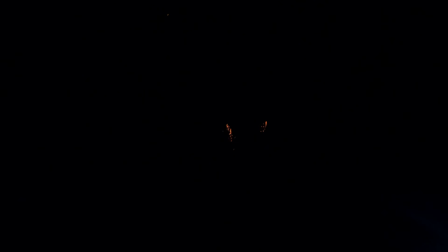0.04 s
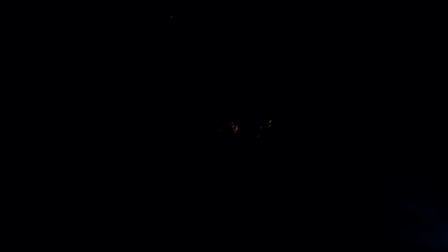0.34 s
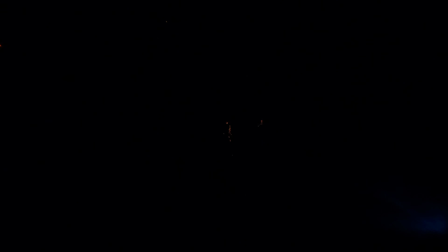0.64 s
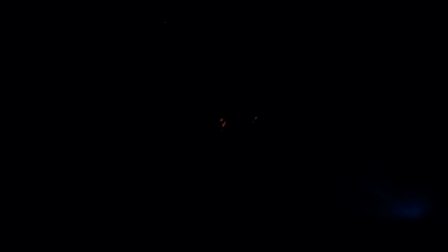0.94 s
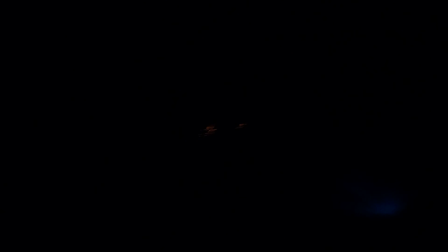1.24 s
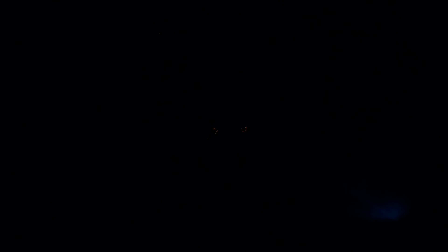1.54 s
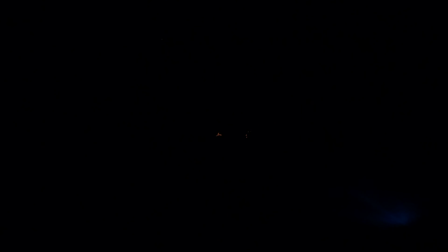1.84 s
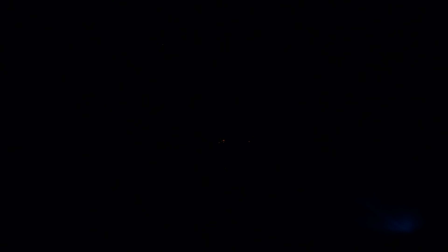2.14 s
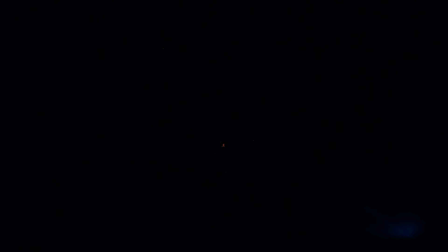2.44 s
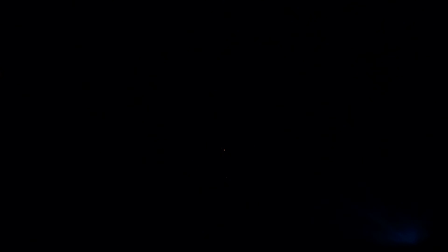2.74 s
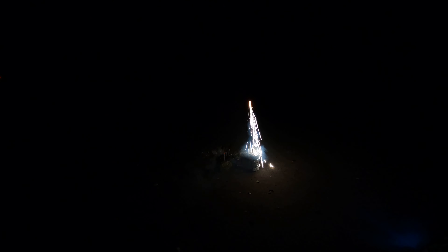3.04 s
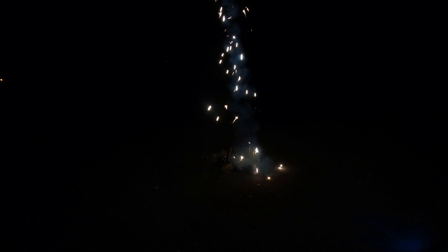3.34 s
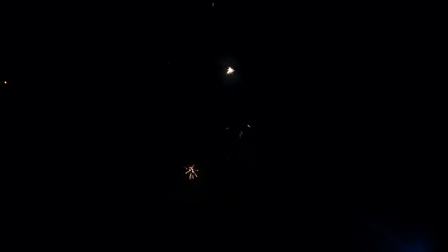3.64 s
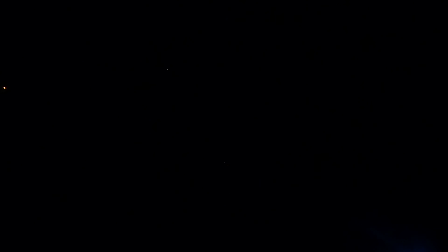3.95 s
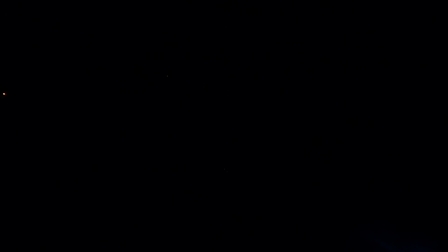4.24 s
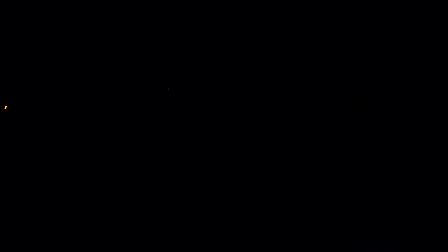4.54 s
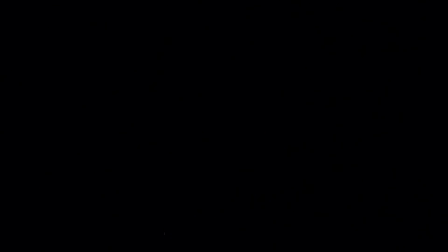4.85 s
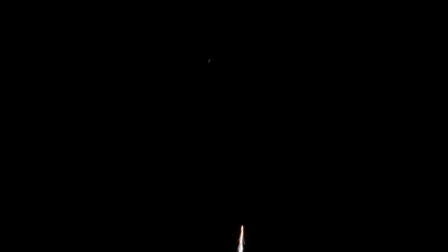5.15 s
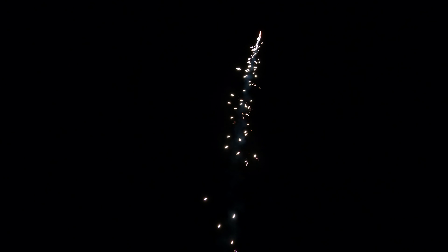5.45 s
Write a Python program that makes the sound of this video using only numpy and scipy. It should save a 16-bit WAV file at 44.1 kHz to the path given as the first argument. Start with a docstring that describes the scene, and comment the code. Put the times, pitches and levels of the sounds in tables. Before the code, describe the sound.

A firework fuse fizzes faintly outdoors, with small spits and sharp little pops at the very start, around 0.7 seconds and again at 1.5 seconds. A soft gust rumbles on the microphone near 1.2 seconds. After a short spit, the first rocket catches at 3 seconds with a very loud, sharp chirp and a low buffet of wind. A loud, shrill, raspy whistle follows at once over a rushing jet hiss, sliding steadily down in pitch. From about 4 seconds it grows thinner, fainter and wavering as the rocket climbs, warbling briefly around 4.6 seconds. At 4.9 seconds, with another light gust, a second sharp chirp starts the next rocket. Its whistle begins high again, wobbles, then falls, staying loud until the end at about 5.6 seconds. Dull echoes from the surroundings trail both whistles.

```python
"""Two whistling rockets at night

A fuse hisses, spits and pops on open ground. Each motor catches with a sharp chirp, then its burn
pulsates in the tube and screams downward in pitch as the rocket climbs on a rushing jet.
The ray reflected by the ground interferes with the direct one, the surroundings scatter echoes,
and gusts rumble on the microphone."""
import sys
import numpy as np
from scipy import signal
from scipy.fft import rfft, irfft, next_fast_len
from scipy.io import wavfile
from scipy.ndimage import map_coordinates

SR = 44100
rng = np.random.default_rng(int(sys.argv[2]) if len(sys.argv) > 2 else 0)


def bounce(signal):
    """Save signal as a 16-bit WAV file at the path given by the first command-line argument."""
    frames = np.transpose(np.atleast_2d(signal))
    limited = np.clip(frames, -1, 1)
    pcm = np.round(limited * 32767).astype(np.int16)
    wavfile.write(sys.argv[1], SR, pcm)


N = 246959
TIME = np.arange(N) / SR

# Background level, which sinks once the whistle starts: t/s, level/dB
HUSH_LEVEL = [(0,-48.5),(.4,-53),(1.3,-53.5),(2.2,-56.5),(3.0,-54),(3.3,-82.5),(4.7,-71),(5.6,-68)]


def from_db(db):
    """Amplitude ratio of a level in decibels."""
    return 10 ** (np.asarray(db) / 20)


def rms_one(x):
    """Normalisation to unit mean power."""
    return x / np.sqrt(np.mean(x ** 2) + 1e-20)


def in_time(rows):
    """Linear interpolation of each column at every sample."""
    s, *columns = np.transpose(rows)
    return [np.interp(TIME, s, c) for c in columns]


def at_hz(points, hz):
    """Interpolation of a spectrum on a logarithmic frequency axis."""
    f, value = np.transpose(points)
    return np.interp(np.log(np.maximum(hz, 1)), np.log(f), value)


def panned(pan_db):
    """A level difference as left and right gains whose mean is one."""
    gains = from_db(np.array([[.5], [-.5]]) * pan_db)
    return gains / gains.mean(axis=0)


def drift(rate_hz, step=16):
    """Slow random fluctuation: low-pass noise of unit power."""
    count = next_fast_len(N // step + 2)
    hz = np.fft.rfftfreq(count, step / SR)
    slow = irfft(rfft(rng.standard_normal(count)) / (1 + (hz / rate_hz) ** 2), count)
    return np.interp(np.arange(N) / step, np.arange(count), rms_one(slow))


def coloured_noise(colour, correlation):
    """Partly coherent stereo noise of a given spectral shape and unit power."""
    hz = np.fft.rfftfreq(N, 1 / SR)
    mid, side = rfft(rng.standard_normal((2, N))) * from_db(at_hz(colour, hz))
    alike = np.clip(at_hz(correlation, hz), -1, 1)
    return rms_one(irfft(np.sqrt(1 + alike) * mid + np.sqrt(1 - alike) * side * [[1], [-1]], N))


def filtered(x, edges_hz, kind, order=2):
    """Causal Butterworth filter."""
    sections = signal.butter(order, np.clip(edges_hz, 10, .45 * SR), kind, fs=SR, output="sos")
    return signal.sosfilt(sections, x)


def delayed(x, late_s):
    """Time-varying propagation delay."""
    return map_coordinates(x, [np.arange(N) - late_s * SR], order=3)


def air(flicker_db=1.18):
    """Broadband noise of the night air, with narrow resonances for the hollow fizz of the fuse."""
    # Spectrum of the hush: f/Hz, relative density/dB
    colour = [(60,-3.5),(160,0),(350,-10.5),(600,-8.5),(850,-15),(1400,-7.5),(2000,-13.5),(2700,-10),(3600,-17.5),(4400,-15),(5700,-17),(7200,-21),(10500,-26),(15500,-39.5)]
    # Stereo coherence: f/Hz, left-right correlation
    correlation = [(60,0.41),(300,0.75),(1400,0.76),(3100,0.51),(6800,0.1),(15000,.1)]
    # Resonances of the fuse: f/Hz, bandwidth/Hz, level/dB re the hush
    fuse_rings = [(2700,210,-18.5),(4200,410,-18),(5750,380,-17.5),(8760,430,-22)]
    level_db, = in_time(HUSH_LEVEL)
    hush = coloured_noise(colour, correlation)
    for hz, width, db in fuse_rings:
        ring = filtered(rng.standard_normal(N), [hz - width / 2, hz + width / 2], "band")
        hush = hush + from_db(db) * rms_one(ring)
    return from_db(level_db + flicker_db * drift(30)) * hush


def wind(breeze_db=-3.5, lump_db=4.0, attack_s=0.026, release_db_per_s=106):
    """Turbulent pressure buffets the microphone; a light breeze and the gusts add in power."""
    # Gusts: t/s, time until release/s, level/dB, left-right/dB
    gusts = [(0.072,0.034,-51,-1),(0.446,0.046,-57,-12),(0.746,0.036,-49.5,-3),(0.942,0.026,-55,-12),(1.166,0.026,-33,-16),(1.267,0.079,-36,-6.5),(2.987,0.08,-25.5,-11.5),(3.087,0.087,-25,-24.5),(3.294,0.062,-51,9),(4.763,0.096,-40.5,-1),(4.874,0.15,-36,-1.5),(5.166,0.092,-49,-2),(5.366,0.11,-51.5,-1.5)]
    # Spectrum of the buffeting: f/Hz, relative density/dB
    colour = [(12, -16), (20, 1.5), (43, 4), (69, 0), (232, -22), (276, -31.5), (409, -37.5), (500, -39),
              (650, -62.5), (1100, -120)]
    # Stereo coherence: f/Hz, left-right correlation
    correlation = [(20,0.18),(500,1)]
    hush_db, = in_time(HUSH_LEVEL)
    power = from_db(hush_db + breeze_db) ** 2
    for s, hold_s, db, pan_db in gusts:
        swell = np.clip((TIME - s) / attack_s, 0, 1)
        release_db = release_db_per_s * np.maximum(TIME - s - hold_s, 0)
        power = power + (swell * from_db(db - release_db) * panned(pan_db)) ** 2
    return np.sqrt(power) * from_db(lump_db * drift(25)) * coloured_noise(colour, correlation)


def surroundings(x, t60_s=1.74, first_s=0.032, echoes_per_s=900, damp_hz=3500, spread=.15):
    """Scattering by trees and buildings returns late, dull echoes that decay exponentially."""
    age = np.arange(2 * SR) / SR
    scatter = rng.standard_normal((2, len(age))) * (rng.random(len(age)) < echoes_per_s / SR)
    mid, side = scatter * from_db(-60 * age / t60_s) * np.clip(age / first_s - 1, 0, 1)
    echoes = mid + spread * side * [[1], [-1]]
    echoes /= np.sqrt(np.sum(echoes ** 2) / 2)
    return signal.fftconvolve(np.atleast_2d(x), filtered(echoes, damp_hz, "low"), axes=1)[:, :N]


def spits(grain_db=5.5, spread=0.28):
    """Superposition of tiny powder cracks makes each spit a short swell of band-limited noise."""
    # Spits of fuse and launch: t/s, duration/s, level/dB, centre f/Hz, width/octaves, left-right/dB
    bursts = [(0.0,.056,-44,246,0.46,-4),(0.056,0.052,-40.5,1150,1.5,1),(0.087,0.028,-41.5,330,3,0),(0.113,.025,-53,8550,0.5,3),(0.149,0.058,-49,1650,0.74,0),
              (.467,0.13,-57,5300,0.46,0),(.514,0.0039,-40.5,930,0.41,5),(0.56,0.064,-50,2080,1.4,3),
              (0.675,0.073,-37.5,5700,0.54,0.5),(.681,0.078,-38,2260,1.2,1),(.719,0.028,-34.5,2460,0.21,4),(0.783,0.027,-49,276,1.5,2),(0.863,0.028,-48.5,7560,0.28,4),(0.869,0.0075,-51,2450,0.15,7),(.986,0.049,-58.5,5450,0.16,-7),
              (1.311,0.03,-48,460,1.6,-15),(1.307,0.088,-54.5,3740,1.1,5),(1.504,0.049,-49,1800,2.3,5),(1.525,0.031,-47,4070,.57,-3),
              (1.873,0.017,-50,860,1.4,5),(2.071,0.04,-60.5,8100,0.29,7),(2.076,.03,-55.5,2750,.35,7),(2.283,0.015,-51.5,250,1.4,5),(2.315,0.069,-59.5,1970,2.2,2.5),
              (2.829,0.095,-54,1730,1.2,5.5),(2.916,0.13,-39,2690,0.18,-0.5),(2.984,0.022,-40.5,3830,1.0,-1.5),(2.992,0.028,-25,3330,0.054,-8.5),(2.993,0.034,-34,154,0.73,0),
              (5.048,0.052,-44,228,0.7,0)]
    out = np.zeros((2, N + SR))
    age = np.arange(SR // 4) / SR
    for s, length, db, hz, octaves, pan_db in bursts:
        swell = np.sin(np.pi * np.clip(age / length, 0, 1) ** 0.74).clip(0) ** 0.77
        cracks = from_db(grain_db * np.minimum(rng.exponential(1, len(age)), 5))
        mid, side = rng.standard_normal((2, len(age))) * cracks * swell
        band_hz = hz * 2 ** (np.array([-.5, .5]) * octaves)
        puff = filtered(mid + spread * side * [[1], [-1]], band_hz, "band", order=1)
        puff = filtered(puff, hz * 2 ** (.5 + octaves / 2), "low")
        puff *= from_db(db) / np.sqrt(np.sum(puff ** 2) / (2 * length * SR))
        start = round(s * SR)
        out[:, start:start + len(age)] += puff * panned(pan_db)
    return out[:, :N]


def snaps(decay_s=0.0012):
    """An impulsive source: a single powder grain bursts and dies away within milliseconds."""
    # Bursting grains: t/s, peak level/dB, centre f/Hz, left-right/dB
    grains = [(0.068,-24,1810,4),(.081,-26.5,1510,3),(0.175,-42,2600,0),(.515,-51,1200,3),(.686,-29,4000,5),(.699,-22.5,4500,2.5),(0.713,-16,4040,4),(.724,-23,2340,-2),(.737,-29,2200,1),(.87,-37,7300,2),(1.507,-30,2030,-2),(1.52,-26,2260,0),(1.537,-31,3380,-3),(1.877,-38.5,4000,8),(2.092,-39.5,2500,9)]
    out = np.zeros((2, N))
    age = np.arange(SR // 20) / SR
    for s, db, hz, pan_db in grains:
        burst = rng.standard_normal(len(age)) * np.exp(-age / decay_s)
        crack = filtered(burst, [hz / 2, hz * 1.84], "band")
        start = round(s * SR)
        out[:, start:start + len(age)] += from_db(db) * crack / np.abs(crack).max() * panned(pan_db)
    return out


def chirps():
    """Damped resonance: a motor's first pressure surge rings its tube for a few cycles."""
    # Motors catching: t/s, peak level/dB, f/Hz, rise time/s
    ignitions = [(2.9993,-2.5,3860,.0008),(4.9112,-5.5,3700,.0008)]
    out = np.zeros(N)
    for s, db, hz, rise_s in ignitions:
        age = np.maximum(TIME - s, 0)
        envelope = (age / rise_s) ** 2 * np.exp(2 - 2 * age / rise_s)
        out += from_db(db) * envelope * np.sin(2 * np.pi * hz * age)
    return out


def climb(age, start_m, top_m_per_s, run_up_s, mic_m=1.192, distance_m=3.0, sound_m_per_s=343):
    """Image-source geometry of a rising rocket: the ground ray's delay and the elevation's cosine."""
    height = start_m + top_m_per_s * (age - run_up_s * (1 - np.exp(-age / run_up_s)))
    direct = np.hypot(distance_m, height - mic_m)
    bounced = np.hypot(distance_m, height + mic_m)
    return (bounced - direct) / sound_m_per_s, distance_m / direct


def exhaust(age, ground_s, bright_db, dulling_db_per_s, roar_db=-37.5, split_hz=2800, reflection=0.61):
    """Jet noise recedes, treble first; interference with the ground ray sweeps a comb through the rest."""
    # Spectrum of the jet: f/Hz, relative density/dB
    colour = [(200,-21),(500,-16),(900,-10),(1300,-3.5),(1900,-2.5),(2400,2),(3200,2.5),(4200,-2.5),(6000,-9.5),(9000,-10.5),(12000,-22.5),(15500,-35)]
    # Stereo coherence: f/Hz, left-right correlation
    correlation = [(200,0.96),(1500,1),(5000,1),(15000,0.23)]
    rush = coloured_noise(colour, correlation)
    hz = np.fft.rfftfreq(N, 1 / SR)
    low = irfft(rfft(rush) / (1 + (hz / split_hz) ** 4), N)
    bounced = np.array([delayed(channel, ground_s) for channel in low])
    combed = (low + reflection * bounced) / np.hypot(1, reflection)
    treble = from_db(bright_db - dulling_db_per_s * age) * (rush - low)
    level_db = roar_db - 8.5 * np.maximum(age - 0.75, 0)   # holds, then fades
    return from_db(level_db) * (combed + treble)


def rising_tones(hz, phase, rasp_db, pivot_hz=13600, loss_db_per_khz=10.5):
    """Frequency mirroring about a pivot: faint high tones rise as harmonics 8 and 9 fall."""
    out = 0
    for k, db in ((8, -38), (9, -22.5)):
        above_khz = np.maximum(pivot_hz - k * hz, 0) / 1000
        level_db = rasp_db + db - loss_db_per_khz * above_khz + 3 * drift(70)
        out = out + from_db(level_db) * np.sin(2 * np.pi * 2 * pivot_hz * TIME - k * phase)
    return out


def corkscrew(age, centre_s=1.63, spell_s=.2, turns_hz=15):
    """Periodic modulation, swelling and fading, while a rocket corkscrews for a spell."""
    spell = np.exp(-((age - centre_s) / spell_s) ** 2)
    return spell * np.sin(2 * np.pi * turns_hz * age + 0.2 * drift(8))


def whistle(pitch, voice, age, ground_s, reflection, jitter, waver, flutter_db_per_s, rasp_flutter_db):
    """Period doubling: the burn pulses strong and weak in turn, adding a half-pitch rasp to the whistle."""
    # Odd harmonics of the pulsation: harmonic number, level/dB re the rasp
    odd_harmonics = [(1,-3.5),(3,0),(5,-8.5),(7,-13),(9,-27.5)]
    # Upper even harmonics: harmonic number, level/dB re the octave
    even_harmonics = [(4,-1),(6,-13.5),(8,-24.5),(10,-29)]
    hz, = in_time(pitch)
    main_db, rasp_db, octave_db, loss_db = in_time(voice)
    # Turbulence shakes the period, which widens the upper lines.
    shake = jitter * drift(240) + waver * (1 + age) * drift(41.3)
    spin = corkscrew(age)
    hz = hz * (1 + 0.015 * spin)   # Doppler warble
    phase = 2 * np.pi * np.cumsum(hz * (1 + shake)) / SR
    rasp_db = rasp_db + rasp_flutter_db * drift(57)
    # Moving air makes the level waver more the further the rocket has flown.
    twinkle_db = age * (flutter_db_per_s * drift(110) + 1.22 * drift(30))
    partials = [(2, main_db + twinkle_db + 5 * spin)]
    for harmonics, base_db in ((odd_harmonics, rasp_db), (even_harmonics, octave_db)):
        for k, db in harmonics:
            partials.append((k, base_db + db - loss_db * max(k - 4, 0) + 2.82 * drift(110)))
    out = 0
    for k, level_db in partials:
        mirror = reflection * min(1, 2 / k) ** 1.2   # rough ground reflects short waves less well
        rays = np.sin(k * phase) + mirror * np.sin(k * (phase - 2 * np.pi * hz * ground_s))
        out = out + from_db(level_db) * rays * np.sqrt(2 / (1 + mirror ** 2))
    return out + rising_tones(hz, phase, rasp_db)


def rocket(pitch, voice, flight, jet, roughness, mirror_s, aside):
    """A moving source over reflecting ground: the sound at the microphone and that sent off to echo."""
    age = np.maximum(TIME - pitch[0][0], 0)
    burning = np.clip(age / 0.0068, 0, 1) * np.clip((pitch[-1][0] + .016 - TIME) / .008, 0, 1)
    ground_s, lowness = climb(age, **flight)
    # The ground reflects well until an age of mirror_s, then only faintly.
    early = .5 * (1 - np.tanh(.5 * (age - mirror_s) / 0.039))
    reflection = np.interp(early, [0, 1], [0.099, 0.79])
    scream = whistle(pitch, voice, age, ground_s, reflection, **roughness)
    left, right = (scream + exhaust(age, ground_s, **jet)) * burning
    left_lag_s = aside * 31e-6 * lowness ** 2   # greatest while the rocket is low on the right
    sound = np.array([delayed(left, left_lag_s), right])
    echo_db = np.interp(age, [0, 0.47], [-35, -13.5])   # climbing, it reaches more of the surroundings
    return sound, sound * from_db(echo_db)


def scene(spit_echo_db=-21):
    """Superposition of the night air, the fuse, two rockets and their echoes."""
    # Burn pulsation of each motor, whose second harmonic is the whistle: t/s, f/Hz
    pitch_1 = [(3.0,1787),(3.02,1833),(3.122,1792),(3.196,1699),(3.42,1556),(3.62,1426),(3.74,1385),(4.02,1298),(4.32,1196),(4.72,1131),(4.9,1076)]
    pitch_2 = [(4.912,1637),(4.946,1596),(4.992,1723),(5.202,1600),(5.328,1488),(5.434,1414),(5.6,1320)]
    # Strength of each motor: t/s, whistle/dB, rasp/dB, octave/dB, loss per harmonic above the fourth/dB
    voice_1 = [(3.0,-11,-32.5,-43.5,1.5),(3.2,-15,-36,-43,0),(3.38,-16.5,-38,-33,0.5),(3.64,-17.5,-37.5,-35,2.5),(3.8,-22,-45,-35.5,6),(4.0,-20.5,-58,-43,14),(4.2,-31,-65.5,-45.5,4.5),(4.35,-20.5,-71,-46,2),(4.55,-33,-73.5,-47,1),(4.9,-28.5,-71,-48.5,-2)]
    voice_2 = [(4.913,-9.5,-30,-26,0.35),(4.97,-15.5,-33.5,-37.5,0),(5.149,-14.5,-32.5,-40.5,1.1),(5.25,-13.5,-35.5,-38.5,0.03),(5.36,-15,-33,-31,0.8),(5.6,-16.5,-37.5,-36,2.6)]
    first, first_sent = rocket(
        pitch_1, voice_1, mirror_s=1.42, aside=0.76,
        flight=dict(start_m=.071, top_m_per_s=18.24, run_up_s=.459),
        jet=dict(bright_db=3.5, dulling_db_per_s=15.5),
        roughness=dict(jitter=0.0047, waver=0.0018, flutter_db_per_s=1.5, rasp_flutter_db=2.5))
    second, second_sent = rocket(
        pitch_2, voice_2, mirror_s=0.24, aside=0.02,
        flight=dict(start_m=.089, top_m_per_s=90, run_up_s=1.08),
        jet=dict(bright_db=6, dulling_db_per_s=19.5),
        roughness=dict(jitter=0.006, waver=0.00093, flutter_db_per_s=2.5, rasp_flutter_db=0.4))
    crackle = spits() + snaps() + chirps()
    echoes = surroundings(first_sent + second_sent + from_db(spit_echo_db) * crackle)
    return first + second + crackle + echoes + air() + wind()


def record(dry, cutoff_hz=15500):
    """Microphone response: a duller left port, clipping at full scale and a steep low-pass."""
    # Balance of the two ports: f/Hz, left-right/dB
    balance = [(100,0.5),(4500,0),(8000,-0.8),(14000,-6)]
    ports = panned(at_hz(balance, np.fft.rfftfreq(2 * N, 1 / SR)))
    heard = np.clip(irfft(rfft(dry, 2 * N) * ports)[:, :N], -1, 1)
    return signal.sosfilt(signal.ellip(10, .1, 80, cutoff_hz, fs=SR, output="sos"), heard)


dry = scene()
out = record(dry)
bounce(out)
```